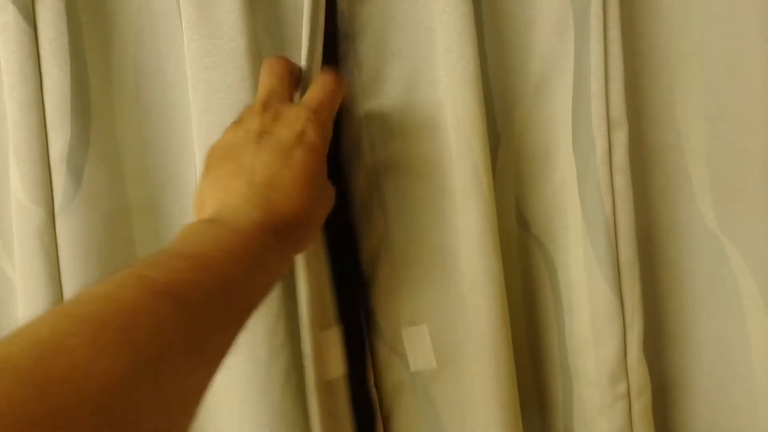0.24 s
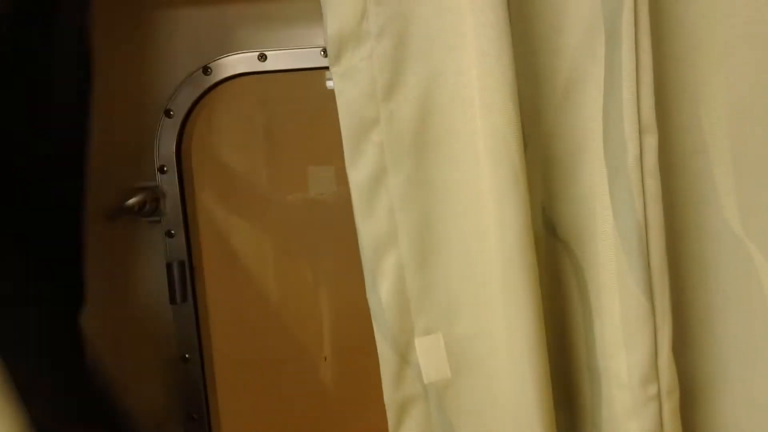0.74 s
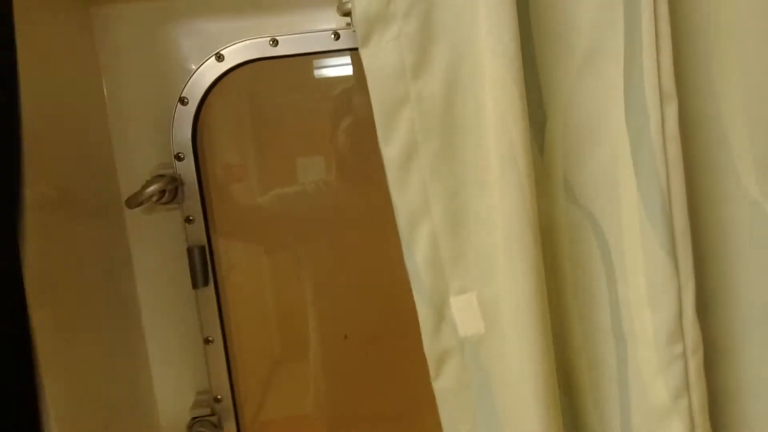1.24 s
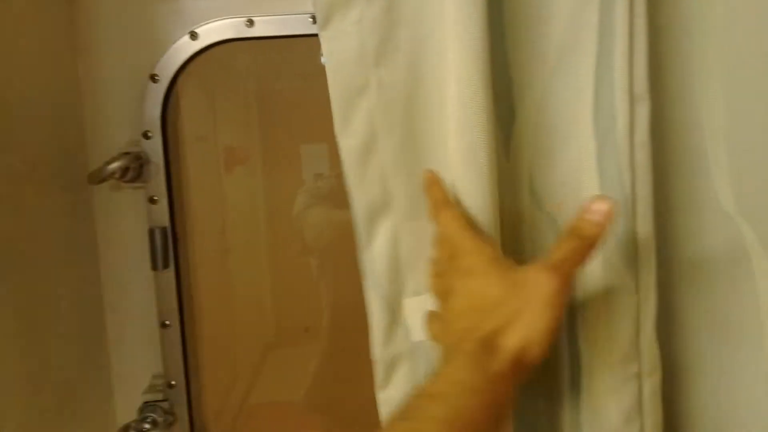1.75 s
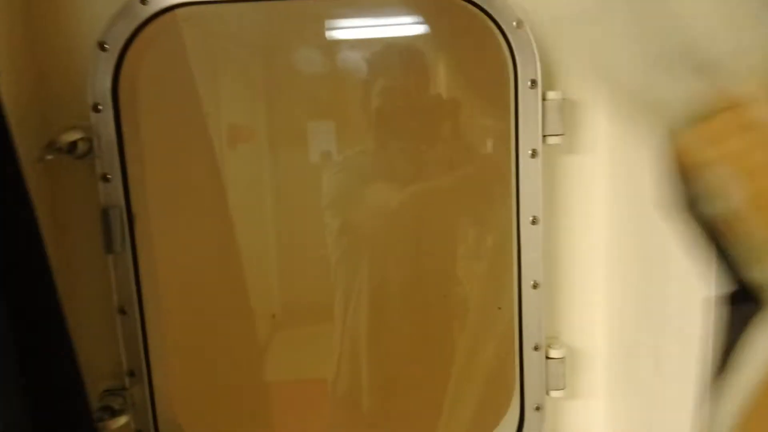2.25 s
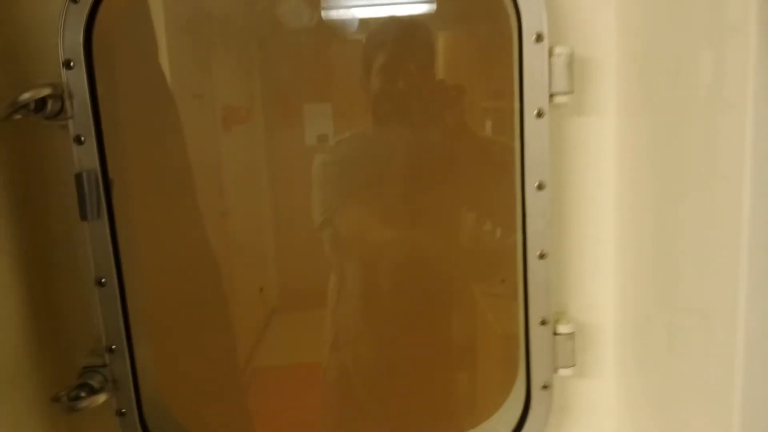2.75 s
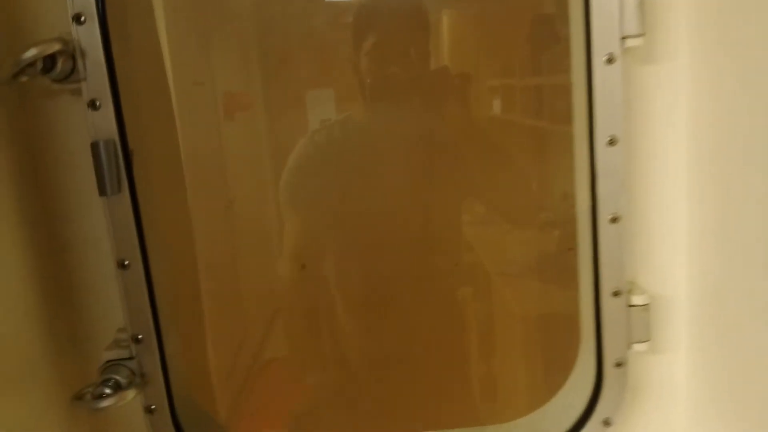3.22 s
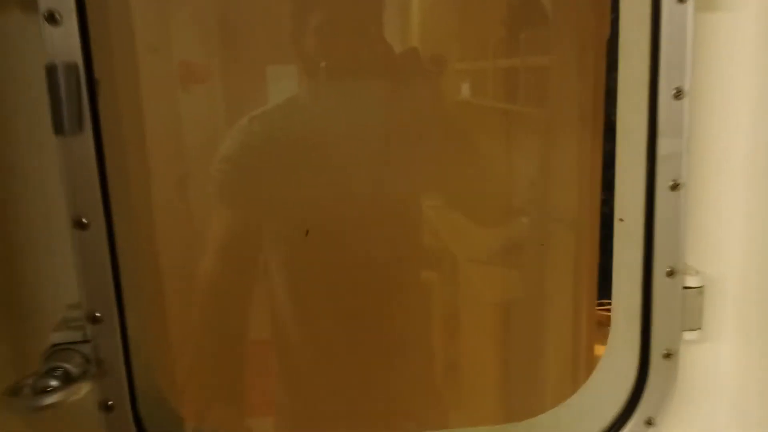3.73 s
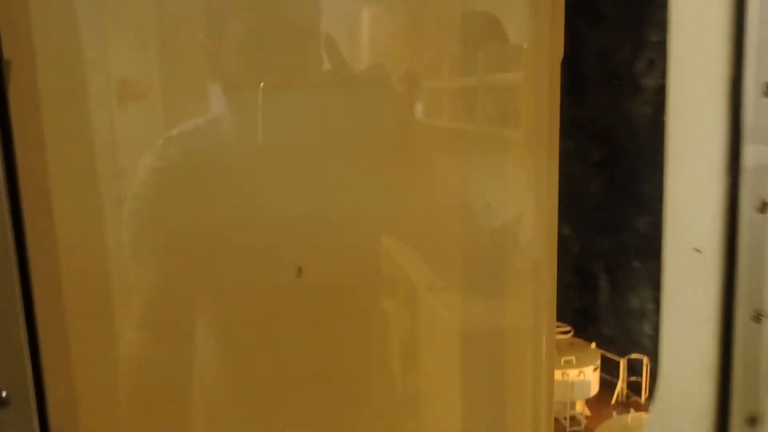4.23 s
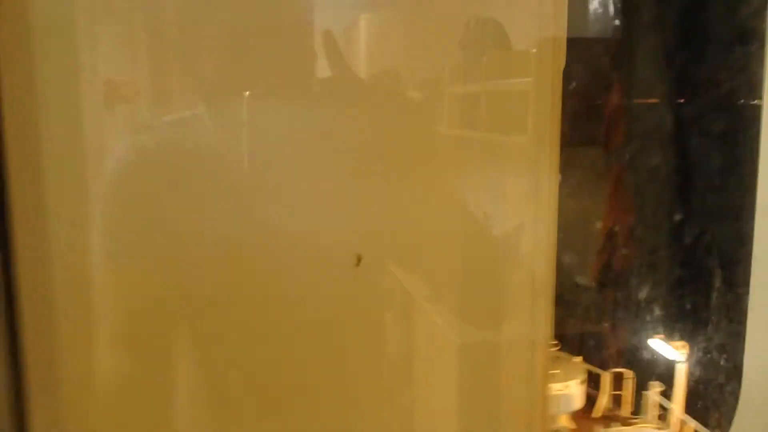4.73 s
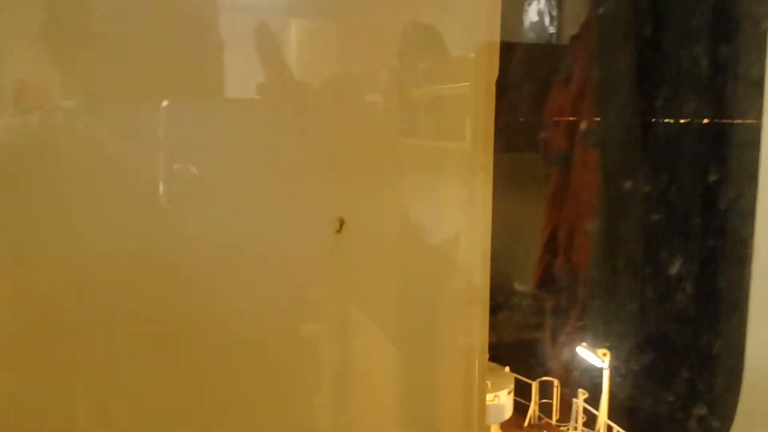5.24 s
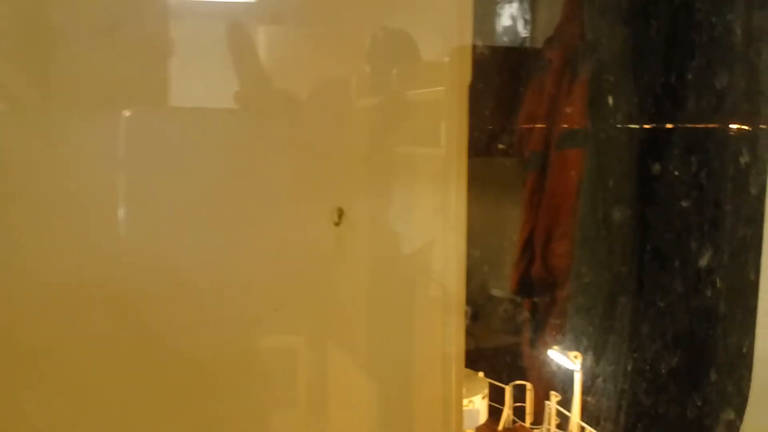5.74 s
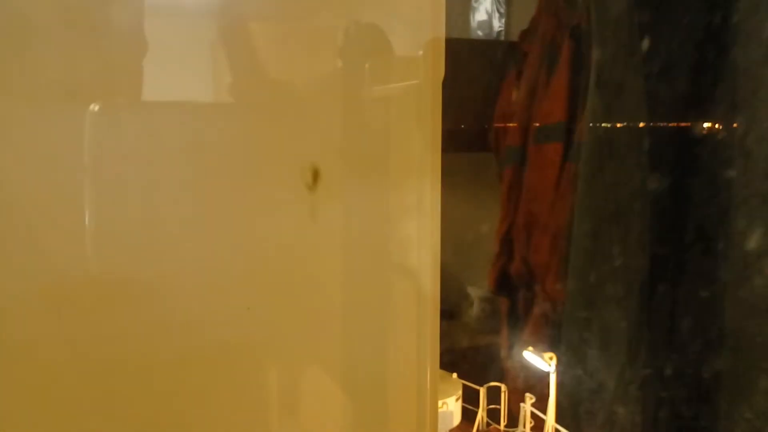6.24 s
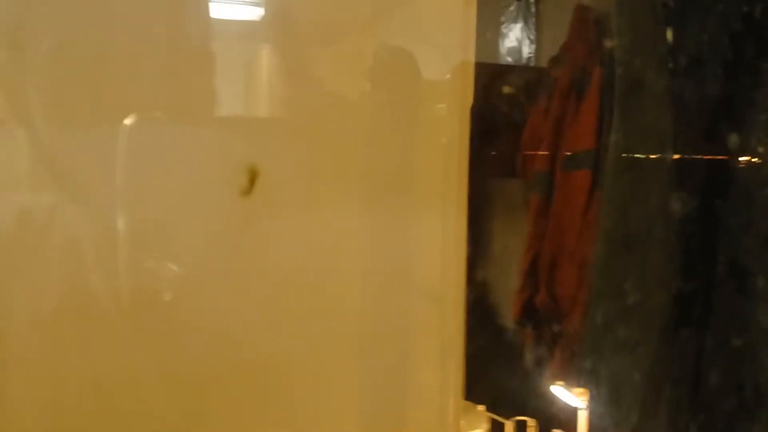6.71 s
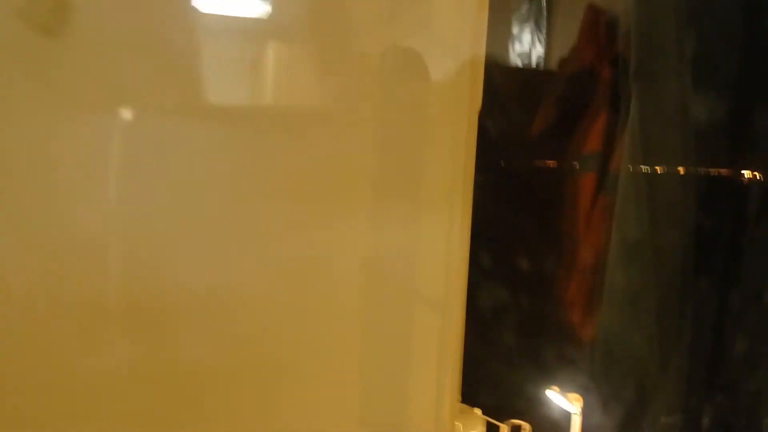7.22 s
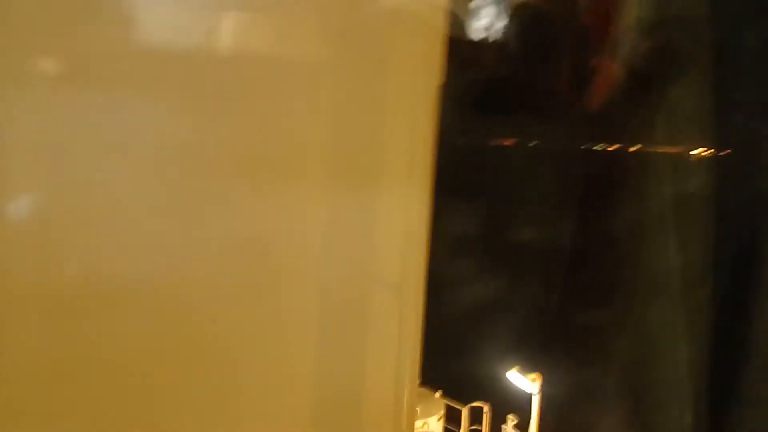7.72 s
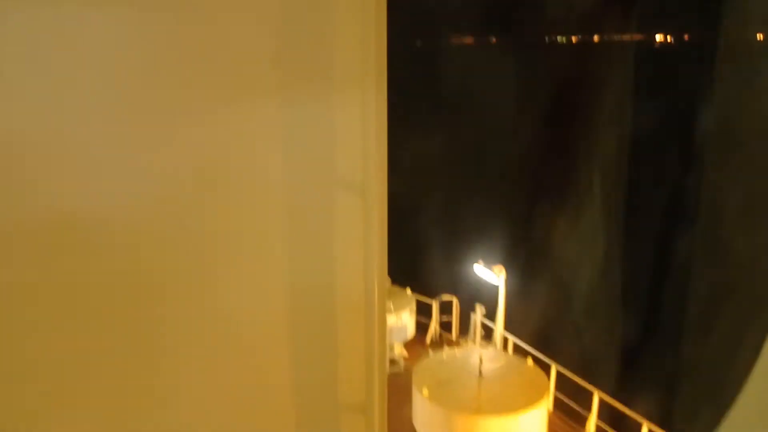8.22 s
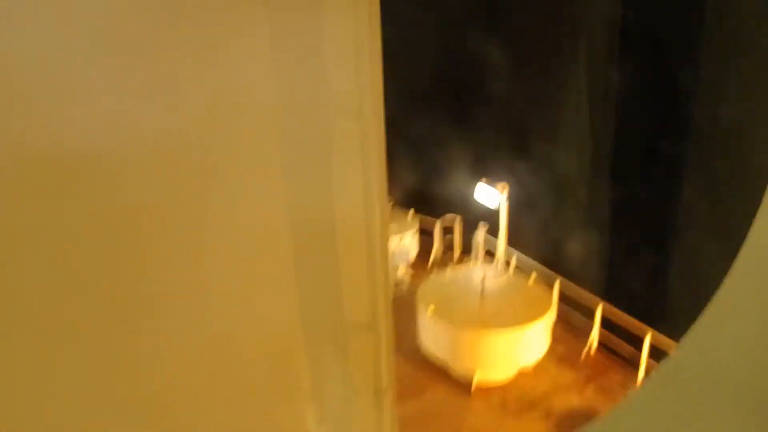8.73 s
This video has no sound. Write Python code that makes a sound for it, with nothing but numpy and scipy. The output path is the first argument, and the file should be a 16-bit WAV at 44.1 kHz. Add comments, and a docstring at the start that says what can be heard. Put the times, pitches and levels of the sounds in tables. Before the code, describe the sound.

A wavering low hull tone and soft machinery wash sit under close cloth sounds in a ship's cabin. Two curtain pulls scrape along a rail with hard little gliders clicking, ringing briefly in the room. After one flat slap the microphone moves toward the glass, the background becoming louder and hollow with window resonances, while clothes brush and crackle nearby, busiest just past seven seconds.

```python
"""Ship's cabin, curtains drawn aside

Machinery drones (wavering tone, narrow noise) and washes (filtered noise) through the hull; the wash
swells and is recoloured as the microphone nears the window. A hand draws two curtain halves: grainy
coloured noise, with gliders ticking on the rail as short noise bursts. Clothing rustles and snaps
close by, thin gliding tones squeak, something slaps once; curtain and slap ring in the cabin."""
import sys
import numpy as np
from scipy import signal
from scipy.fft import rfft, irfft
from scipy.io import wavfile
from scipy.ndimage import uniform_filter1d

SR = 44100
rng = np.random.default_rng(int(sys.argv[2]) if len(sys.argv) > 2 else 0)


def output_pcm(signal):
    """Save a mono or channel-first signal as 16-bit PCM at the path in sys.argv[1].

    Samples are clipped to [-1, 1] before scaling.
    """
    pcm = np.clip(np.atleast_2d(signal).T, -1, 1) * 32767
    wavfile.write(sys.argv[1], SR, np.round(pcm).astype(np.int16))


def natural_amplitude(level_db):
    """Convert a level in decibels to a linear amplitude factor, elementwise."""
    exponent = np.asarray(level_db, float) / 20
    return 10 ** exponent


N = 395577
T = np.arange(N) / SR  # s
CREST = 3  # noise peak over rms, roughly


def evened(x):
    """Scales to rms 1."""
    return x / np.sqrt(np.mean(x ** 2) + 1e-20)


def smooth_twice(x, samples):
    """Two moving averages along the last axis."""
    return uniform_filter1d(uniform_filter1d(x, samples), samples)


def read(points, hz, axis=1):
    """One column of a table, interpolated on a log-frequency axis."""
    rows = np.transpose(points)
    return np.interp(np.log(hz + 1), np.log(rows[0] + 1), rows[axis])


def level(rows):
    """Gain along time from (t/s, level/dB) rows, faded to silence within 0.03 s outside them."""
    s, db = np.transpose(rows)
    return natural_amplitude(np.interp(T, np.r_[s[0] - .03, s, s[-1] + .03], np.r_[-120, db, -120]))


def ports(z1, z2, hz, direct=0):
    """Left and right spectra from two unrelated ones; channel likeness is at least direct."""
    # the two microphone ports: (f/Hz, likeness 0-1, left minus right/dB)
    port_rows = [(60, 0.97, -3), (308, 0.94, -4.5), (600, 0.85, -2), (950, 0.73, -2.5), (1400, 0.6, -7.5),
                 (1800, 0.12, -10.5), (2540, 0.14, -7.5), (3860, 0, -4), (5550, 0, -0.5), (10400, 0, -9)]
    flip_hz = 1855  # ports first out of phase
    same = np.clip(np.maximum(read(port_rows, hz), direct), 0, 1)
    pan_db = read(port_rows, hz, axis=2)
    phase = -np.pi * np.where(hz < flip_hz, (hz / flip_hz) ** 2, 2 * hz / flip_hz - 1)
    right = same * np.exp(1j * phase) * z1 + np.sqrt(1 - same ** 2) * z2
    return np.array([z1 * natural_amplitude(pan_db / 2), right * natural_amplitude(-pan_db / 2)])


def hiss(spectrum, lo_hz, hi_hz, direct=0.047):
    """Steady coloured two-channel noise; rms 1 in lo-hi of the channel mean."""
    hz = np.fft.rfftfreq(N, 1 / SR)
    z = ports(*rfft(rng.standard_normal((2, N))), hz, direct) * natural_amplitude(read(spectrum, hz))
    band = z.mean(0) * (hz > lo_hz) * (hz < hi_hz)
    return irfft(z, N) / np.std(irfft(band, N))


def grain(per_s, spread_db, t60_s):
    """Gain made of many tiny decaying slips of uneven size, rms 1."""
    happens = rng.random(N) < per_s / SR
    size = natural_amplitude(spread_db * np.minimum(rng.exponential(1, N), 4)) * happens
    return evened(signal.lfilter([1], [1, -natural_amplitude(-60 / (t60_s * SR))], size))


def burst(s, db, t60_s, rise_s):
    """Gain of one blow: quick rise from s - rise, exponential fall."""
    t = np.maximum(T - s + rise_s, 0)
    return natural_amplitude(db - 60 * np.minimum(t / t60_s, 3)) * (1 - np.exp(-t / rise_s))


def tick(s, db, swell_s, t60_s):
    """Gain of one tick: exponential swell up to s, exponential fall after."""
    fall = natural_amplitude(db - 60 * np.clip((T - s) / t60_s, 0, 3))
    return fall * np.exp(np.clip((T - s) / max(swell_s, 1 / SR), -20, 0))


def folds(x, patchy_db, frames, bins):
    """Moving folds of cloth colour a noise in drifting time-frequency patches; rms is kept."""
    z = signal.stft(x, nperseg=256, noverlap=192)[2]
    patches = rng.standard_normal(z.shape[:0:-1]).T
    patches = evened(uniform_filter1d(uniform_filter1d(patches, bins, 0), frames, 1))
    y = signal.istft(z * natural_amplitude(patchy_db * patches), nperseg=256, noverlap=192)[1][:, :N]
    return evened(y) * np.std(x)


def brushing(axis):
    """Gain of cloth brushes, each rising to a peak and dying; axis 1 dull, 2 bright."""
    # brushed or swinging cloth, before grain:
    # (peak t/s, dull level/dB, bright level/dB, rise/s, fall/s)
    brushes = [(1.44, -63.5, -58, 1, 0.34), (2.56, -62, -40, 0.098, 0.32), (3.56, -79, -59, 0.062, 0.2),
               (5.936, -57, -49.5, 0.094, 0.1), (6.661, -45.5, -56, 0.012, 0.17),
               (6.735, -57, -55, 0.41, 0.054), (7.21, -50.5, -74, 0.34, 0.24)]
    range_db = 30  # gained over the rise, lost over the fall
    out = np.zeros(N)
    for row in brushes:
        s, rise_s, fall_s = row[0], row[-2], row[-1]
        away = np.where(T < s, (s - T) / rise_s, (T - s) / fall_s)
        out += natural_amplitude(row[axis] - range_db * np.minimum(away, 3))
    return out


def drone():
    """One strong hull resonance: a tone wavering in pitch and level, with a fuzzy noise skirt."""
    # nominal drone level before waver and pan: (t/s, level/dB)
    drone_level = [(0.02, -43), (1.27, -41.5), (1.32, -33.5), (1.84, -43.5), (3.71, -45.5), (3.91, -33.5),
                   (8.97, -26.5)]
    drone_hz, drift_hz, waver_db = 161.7, 2.44, 2.2  # drift and waver are rms
    drift = evened(smooth_twice(rng.standard_normal(N), 2500))
    tone = np.sqrt(2) * np.sin(2 * np.pi * np.cumsum(drone_hz + drift_hz * drift) / SR)
    a, b = smooth_twice(rng.standard_normal((2, N)), 900)
    phase = 2 * np.pi * drone_hz * T
    fuzz = evened(a * np.cos(phase) + b * np.sin(phase))
    waver = natural_amplitude(waver_db * evened(smooth_twice(rng.standard_normal(N), 3500)))
    pan = natural_amplitude(np.array([[-1.9], [1.6]]))
    return level(drone_level) * (1.02 * waver * tone + 0.45 * fuzz) * pan


def wash():
    """Broad machinery noise; nearer the glass its spectrum and window resonances change."""
    # nearness to the window: (t/s, 0 mid-cabin to 1 at the glass)
    nearness = [(0, 0.011), (3, 0.17), (3.7, 0.13), (4.2, 0.27), (5, 0.37), (6, 0.53), (7, 0.68),
                (8.05, 0.87), (8.3, 0.97), (8.97, 0.96)]
    # wash spectrum mid-cabin, relative to wash_db: (f/Hz, level per Hz/dB)
    wash_far = [(20, -26), (33, -13.5), (60, 1), (100, -1.5), (200, -6.5), (300, -14), (600, -24),
                (1200, -26), (2300, -30.5), (3500, -42.5), (10000, -46.5), (16000, -48.5)]
    # wash spectrum at the glass, relative to wash_db: (f/Hz, level per Hz/dB)
    wash_near = [(20, -18), (33, -7.5), (60, 3), (100, 2.5), (135, 0.5), (162, -8.5), (200, 6), (260, -16),
                 (600, -7.5), (1000, -16), (2300, -21.5), (3000, -33), (4500, -50), (10000, -53),
                 (16000, -58)]
    # window and wall resonances and dips, before waver: (f mid-cabin/Hz, f at glass/Hz, width/Hz,
    # lift at nearness 0/dB, at .45/dB, at .8/dB, at 1/dB)
    pane = [(127, 127, 19, -10, 4.5, 12, 2.5), (300, 299, 10.3, -8, 11.5, 14, 18.5),
            (344, 306, 45, 7.5, -4.5, -9.5, -1.5), (453, 420, 88, 2, 6, 5, 3),
            (565, 510, 37, -0.5, 5, 8, 6.5), (760, 660, 56, 3, 11.5, -1, -3.5),
            (1073, 1140, 43, -4.5, 7, 10.5, -0.5), (1720, 1760, 62, 0.5, 9, 9.5, -1),
            (2205, 1970, 70, -2.5, 5.5, 9.5, -7.5), (3400, 3400, 97, 4, 10, 13, 8)]
    wash_db, pane_waver = -52, .15  # per Hz; rms share by which a lift comes and goes
    size = 4096
    hz = np.fft.rfftfreq(size, 1 / SR)
    t = np.arange(4 * N // size + 5) * size / 4 / SR
    near = np.interp(t, *np.transpose(nearness))[:, None]
    db = (1 - near) * read(wash_far, hz) + near * read(wash_near, hz)
    wavers = evened(uniform_filter1d(rng.standard_normal((len(t), len(pane))), 8, 0))
    for (far_hz, near_hz, width_hz, *lift_db), waver in zip(pane, wavers.T):
        f = far_hz + near * (near_hz - far_hz)
        firm = 1 + pane_waver * waver[:, None]
        lift = firm * np.interp(near, [0, .45, .8, 1], lift_db)
        db += lift / (1 + (2 * (hz - f) / width_hz) ** 2)
    a, b, c, d, patches = np.moveaxis(rng.standard_normal((len(t), len(hz), 5)), 2, 0)
    broad = evened(uniform_filter1d(uniform_filter1d(patches, 5, 0), 20, 1))
    # narrow cabin modes drifting slowly
    narrow = evened(uniform_filter1d(uniform_filter1d(patches[::-1], 50, 0), 3, 1))
    db += 1.0 * broad + 2.0 * narrow * (hz < 4000)
    z = ports(a + 1j * b, c + 1j * d, hz) * natural_amplitude(wash_db + db)
    per_hz = np.sqrt(SR / size) / 2  # level per Hz to level per bin
    y = signal.istft(z.transpose(0, 2, 1), nperseg=size, noverlap=3 * size // 4)[1]
    return per_hz * y[:, :N]


def moan():
    """A narrow band of hum, shaped noise, that joins late, close to the glass."""
    # hum colour: (f/Hz, relative level per Hz/dB)
    moan_colour = [(690, -47.5), (738, 7.5), (805, -4.5), (900, -48.5)]
    # hum level: (t/s, level/dB)
    moan_level = [(8.0, -52), (8.4, -41.5), (8.95, -47)]
    return level(moan_level) * hiss(moan_colour, 0, SR)


def wisp():
    """A thin band of cloth hiss, shaped noise, as the curtain settles."""
    # hiss colour: (f/Hz, relative level per Hz/dB)
    wisp_colour = [(7000, -40), (8900, 2.5), (11500, -40.5)]
    # hiss level: (t/s, level/dB)
    wisp_level = [(2.8, -64), (3.0, -65), (3.18, -61)]
    return level(wisp_level) * hiss(wisp_colour, 0, SR)


def clothing():
    """Rubbing cloth: thin bright noise in puffs and wandering patches; creases snap as short bursts."""
    # fine rustle near the microphone, before puffs: (t/s, level/dB)
    rustle = [(0, -64.5), (.39, -63.5), (.6, -53.5), (1.12, -63), (1.95, -61.5), (2.3, -57.5), (2.9, -58.5),
              (3.4, -63.5), (4.1, -66.5), (5.26, -71), (5.7, -85), (6.1, -66.5), (6.85, -61.5),
              (7.37, -48.5), (7.45, -57.5), (7.88, -54.5), (8.3, -83)]
    # rustle colour: (f/Hz, relative level per Hz/dB)
    cloth_colour = [(4000, -20.5), (7600, -16.5), (9000, -9), (10600, -5.5), (12200, -13), (15800, -26)]
    # snapping creases: (t/s, approximate peak/dB)
    snap_rows = [(0.254, -36.5), (4.4265, -40), (4.97, -42), (5.1118, -41), (5.232, -40.5), (5.6324, -38),
                 (6.3694, -44), (6.8972, -40), (6.9985, -33.5), (7.315, -23), (7.383, -17.5), (7.4014, -43),
                 (7.519, -33), (7.6228, -34), (7.6735, -38), (7.729, -33.5)]
    # snap colour: (f/Hz, relative level per Hz/dB)
    snap_colour = [(2500, -28), (4000, -22.5), (8500, -13.5), (10600, 7.5), (12200, -2), (15800, -22)]
    puffs = uniform_filter1d(grain(40, 4, 0.17), 900)
    rub = (level(rustle) + brushing(axis=2)) * (0.49 + 0.49 * puffs)
    snaps = np.zeros(N)
    for s, db in snap_rows:
        snaps += burst(s, db, 0.024, 0.0004) + burst(s, db - 13, 0.21, 0.0049)  # crack, softer tail
    rustling = rub * folds(hiss(cloth_colour, 7700, 14000), 3.2, 59, 8)
    return rustling + snaps / CREST * hiss(snap_colour, 8700, 14000)


def squeaks():
    """Faint thin tones whose pitch arches and sags at the end."""
    # squeaks before pan: (start t/s, length/s, top f/Hz, peak level/dB, share of pitch lost)
    squeak_rows = [(1.638, .045, 8650, -58, .045), (1.737, .06, 10170, -57, .09),
                   (6.688, .042, 3100, -45, .015)]
    top = .45  # share of the length at which pitch is highest
    out = np.zeros(N)
    for s, length_s, hz, db, sag in squeak_rows:
        u = np.clip((T - s) / length_s, 0, 1)
        pitch_hz = hz * (1 - sag * ((u - top) / (1 - top)) ** 2)
        swell = np.sqrt(np.sin(np.pi * u).clip(0))
        out += natural_amplitude(db) * swell * np.sin(2 * np.pi * np.cumsum(pitch_hz) / SR)
    return out * natural_amplitude(np.array([[-3], [3]]))


def slap():
    """A flat crack as a noise burst; dull knocks on a panel as longer decaying noise."""
    # crack colour: (f/Hz, relative level per Hz/dB)
    crack_colour = [(300, -5), (1000, -11), (2200, -8), (3500, -20.5), (6000, -14), (10000, -8.5),
                    (13300, -11), (16000, -26)]
    # panel colour: (f/Hz, relative level per Hz/dB)
    panel_colour = [(60, 13), (250, 6), (440, 7), (750, -4), (1100, -7.5), (1800, -15), (4000, -33)]
    # dull knocks on the panel: (t/s, level/dB, t60/s)
    thuds = [(4.192, -31.5, 0.9), (7.335, -29, 0.21)]
    slap_s, slap_db = 4.1893, -17.5
    body = sum(burst(s, db, t60_s, 0.0046) for s, db, t60_s in thuds) * hiss(panel_colour, 41, 4000)
    return burst(slap_s, slap_db, 0.028, 0.00023) * hiss(crack_colour, 380, 16000) + body


def gliders():
    """Gliders tick on the rail: a noise burst for the body, a shorter one for the bright edge."""
    # ticks: (t/s, approximate body peak/dB, approximate edge peak/dB, swell before the peak/s)
    ticks = [(0.843, -17, -43, 0.0011), (0.893, -20.5, -40, 0.0019), (1.0907, -19.5, -26, 0.00018),
             (2.118, -32, -41, .0002), (2.199, -32, -52, .0003), (2.2250, -24, -54, .0004),
             (2.2884, -20, -56, 0.00035), (2.4005, -13.5, -30, .0006), (2.4084, -14, -29, 0.0027),
             (2.516, -20, -30, 0.0022), (2.522, -37, -42, 0.00091), (2.5272, -14.5, -30, 0.00068),
             (2.5386, -15.5, -18.5, 0.0022), (2.6958, -21.5, -31, .0003), (2.706, -23.5, -40, 0.0018)]
    # tick body colour: (f/Hz, relative level per Hz/dB)
    body_colour = [(600, -15.5), (2500, 1.5), (5000, -4), (7300, 6), (9000, -17)]
    # tick edge colour: (f/Hz, relative level per Hz/dB)
    edge_colour = [(7500, -31), (9000, 9), (12500, 1), (15000, -1), (16000, -14)]
    body = sum(tick(s, db, swell_s, 0.019) for s, db, _, swell_s in ticks)
    edge = sum(tick(s, db, swell_s, 0.0084) for s, _, db, swell_s in ticks)
    return (body * hiss(body_colour, 1700, 8100) + edge * hiss(edge_colour, 7800, 15000)) / CREST


def curtain():
    """Cloth slips over cloth and rail: coloured noise in dense grains, plus glider ticks."""
    # each curtain half pulled by hand, before grain: one list a half of (t/s, level/dB)
    pulls = [
        [(.55, -66), (.59, -51), (.87, -44.5), (1.1, -47), (1.15, -67)],
        [(2.2, -61), (2.34, -47.5), (2.41, -36), (2.47, -30), (2.6, -52), (2.72, -53), (2.9, -68.5)],
    ]
    # colour of the first half drawn: (f/Hz, relative level per Hz/dB)
    slide_colour = [(410, -34), (750, -2.5), (1150, -10), (1680, -2.5), (2720, -2), (4000, -6),
                    (5080, -11.5), (6860, -2.5), (9500, -6), (15800, -31)]
    # colour of the second half swept aside: (f/Hz, relative level per Hz/dB)
    sweep_colour = [(150, -30.5), (280, -1), (500, -8), (1500, -8.5), (1900, -3.5), (3700, 4), (5200, -3),
                    (7400, 2), (10000, -2.5), (15800, -26.5)]
    # treble that joins late in the first pull: (f/Hz, relative level per Hz/dB)
    sheen_colour = [(5200, -29), (6800, 2.5), (12500, -16)]
    # level of that treble, before grain: (t/s, level/dB)
    sheen_level = [(.86, -47), (1.0, -40), (1.1, -48)]
    # colour of cloth brushed lightly: (f/Hz, relative level per Hz/dB)
    brush_colour = [(880, -30), (1500, -4), (2290, -11.5), (3080, -5.5), (3360, -9), (4520, -16.5),
                    (11900, -29), (15800, -39)]
    slips = 0.55 + 0.55 * grain(500, 3.6, 0.018)
    drag = level(pulls[0]) * hiss(slide_colour, 2510, 6600)
    drag += level(pulls[1]) * hiss(sweep_colour, 2510, 6600)
    drag += level(sheen_level) * hiss(sheen_colour, 5500, 10000)
    drag += brushing(axis=1) * hiss(brush_colour, 2400, 6160)
    return slips * folds(drag, 1.8, 23, 4) + gliders()


def cabin(x):
    """Reverberation: noise tails, one a channel, each band dying at its own speed."""
    # reverberation time: (f/Hz, t60/s)
    cabin_t60 = [(500, 0.22), (2000, 0.5), (5000, 0.22), (12000, 0.21)]
    hz, t, z = signal.stft(rng.standard_normal((2, SR // 2)), SR, nperseg=256)
    decay = natural_amplitude(-60 * t / read(cabin_t60, hz)[:, None])
    tail = signal.istft(z * decay, SR, nperseg=256)[1]
    return signal.fftconvolve(x, tail / np.linalg.norm(tail[0]), axes=1)[:, :N]


def scene():
    """All sources; curtain and slap also ring in the cabin."""
    cloth, blow = curtain(), slap()
    background = drone() + wash() + moan()
    close = wisp() + clothing() + squeaks()
    ring = cabin(natural_amplitude(-9.0) * cloth + natural_amplitude(-4.0) * blow)
    return background + close + cloth + blow + ring


def top_cut(x):
    """Nothing passes above the cut-off."""
    return signal.sosfilt(signal.butter(12, 16480, fs=SR, output="sos"), x)


def record(dry):
    """Band limit: linear-phase low-pass."""
    edge_hz = 15950
    lowpass = signal.firwin(255, edge_hz, window=("kaiser", 7), fs=SR)
    mix = signal.oaconvolve(dry, lowpass[None], "same")
    return top_cut(mix)


dry = scene()
out = record(dry)
output_pcm(out)
```